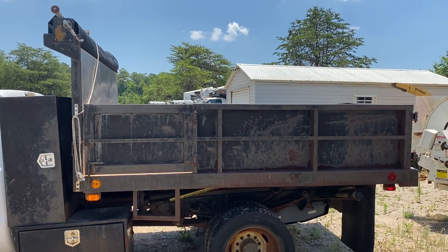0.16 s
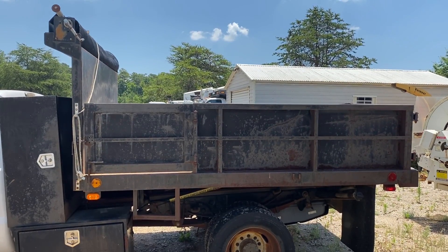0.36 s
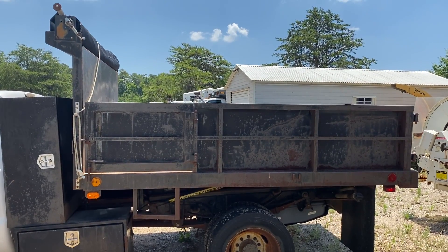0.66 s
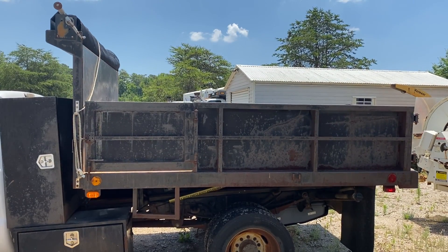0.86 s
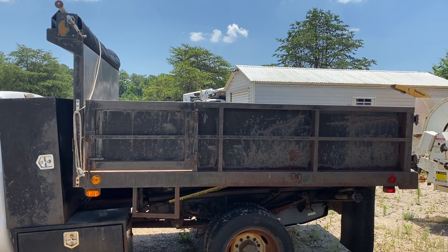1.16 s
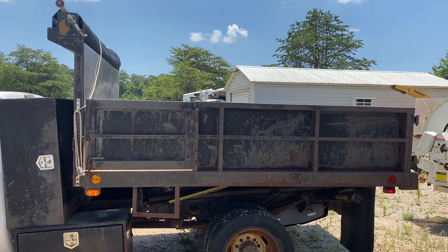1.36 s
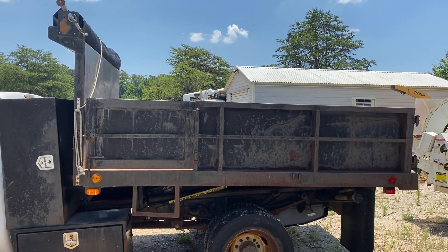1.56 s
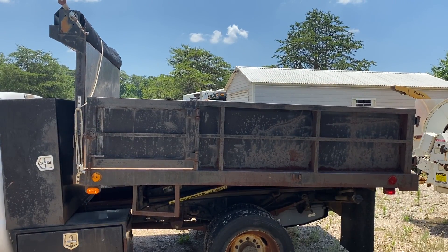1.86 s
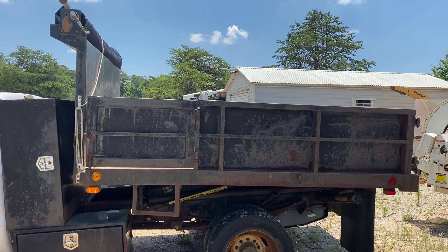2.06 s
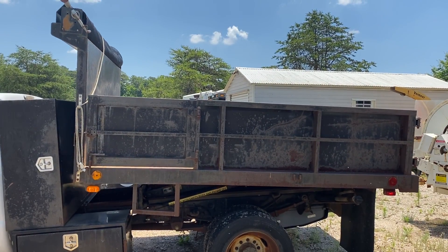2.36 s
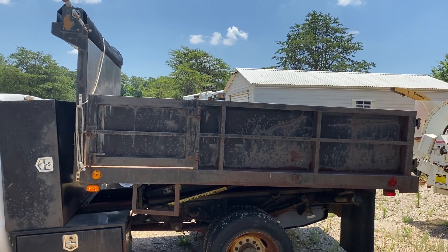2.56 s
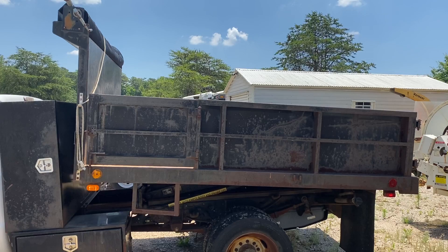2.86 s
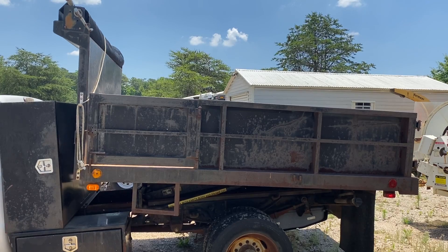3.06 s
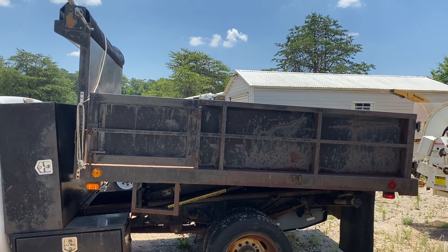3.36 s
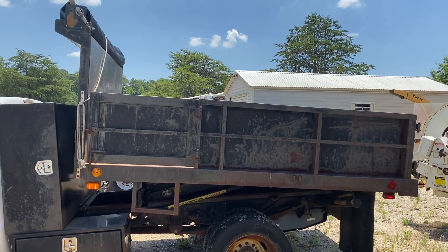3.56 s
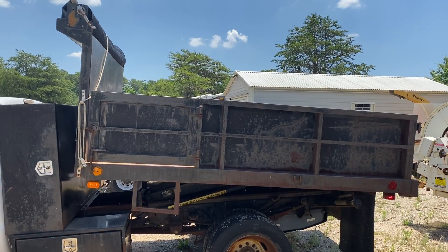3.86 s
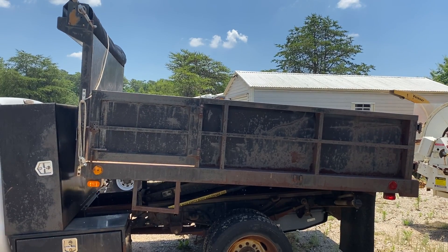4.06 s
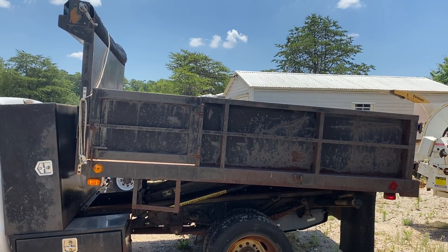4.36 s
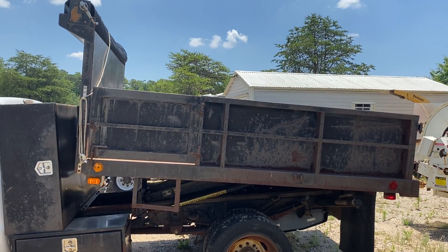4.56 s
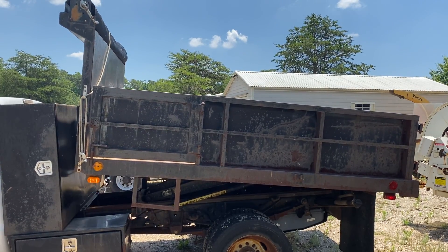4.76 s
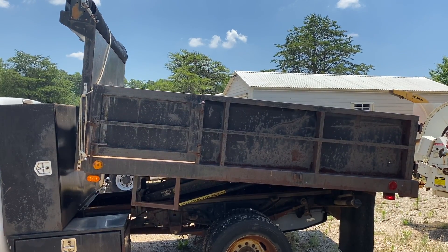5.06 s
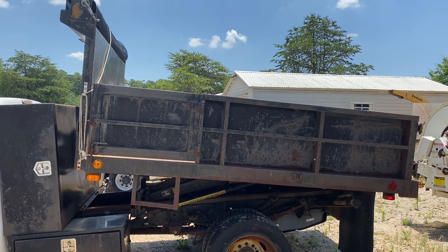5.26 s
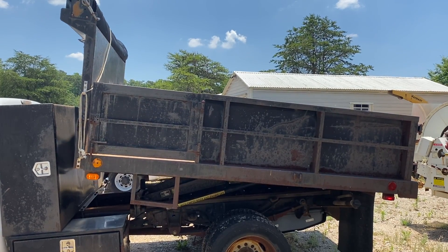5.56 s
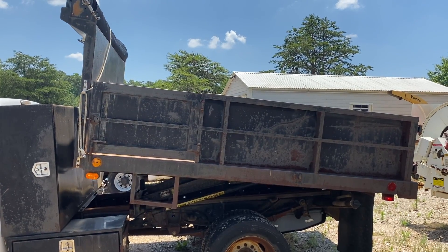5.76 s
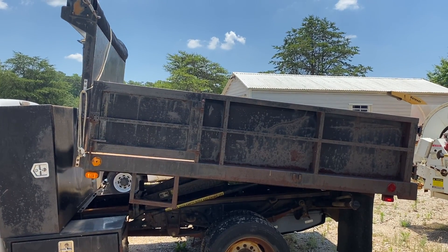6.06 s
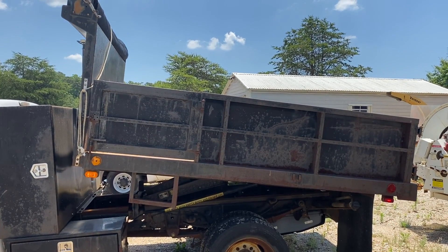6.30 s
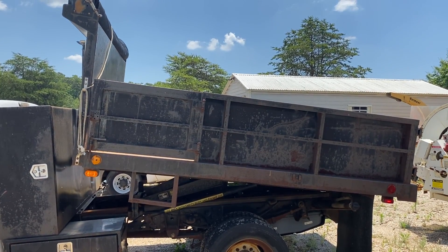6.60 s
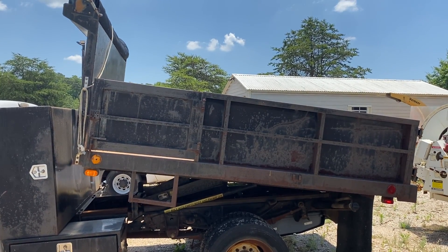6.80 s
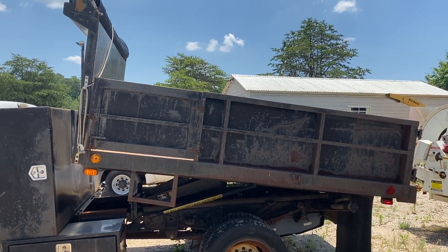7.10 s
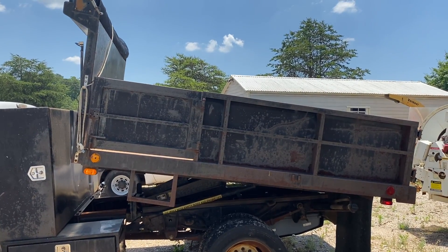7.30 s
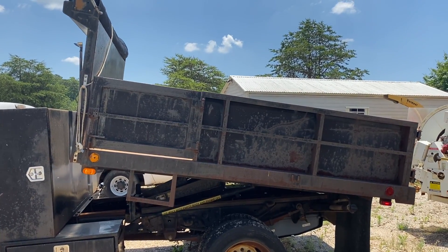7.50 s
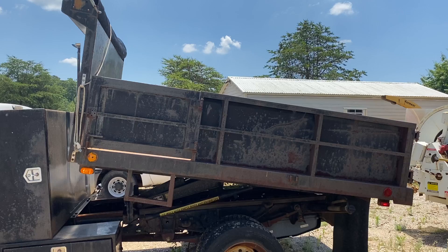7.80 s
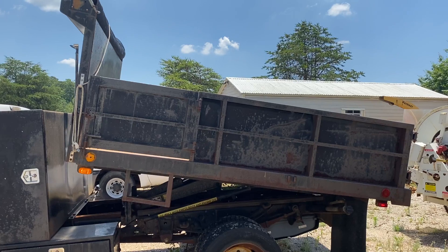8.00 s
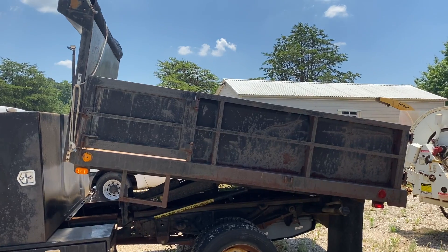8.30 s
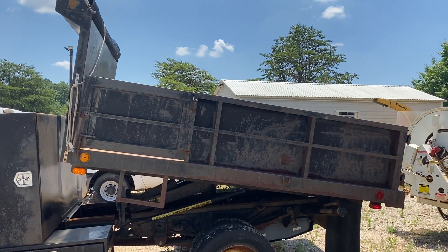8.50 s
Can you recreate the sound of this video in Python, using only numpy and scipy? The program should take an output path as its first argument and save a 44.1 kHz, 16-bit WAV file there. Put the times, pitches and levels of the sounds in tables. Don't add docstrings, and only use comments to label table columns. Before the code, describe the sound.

A continuous metallic pump whine, with high overtones swelling and fading, sits over a deep uneven engine idle and puffing exhaust roar. The pitch inches upward throughout and the pump never stops. Light air buffets the handheld microphone faintly in the open yard, and occasional dull plastic taps come from its right side. The left side is generally louder.

```python
import sys
import numpy as np
from scipy import signal
from scipy.fft import rfft, irfft, next_fast_len
from scipy.io import wavfile
from scipy.ndimage import uniform_filter1d, map_coordinates

SR = 44100
rng = np.random.default_rng(int(sys.argv[2]) if len(sys.argv) > 2 else 0)


def unload_wav(signal):
    wavfile.write(
        sys.argv[1],
        SR,
        np.round(np.clip(np.atleast_2d(signal).T, -1, 1) * 32767).astype(np.int16),
    )


def rack_gain(trim_db):
    fader = np.asarray(trim_db, float)
    return 10 ** (fader / 20)


N = 381024
TEETH = 13


def unit(x):
    return x / np.sqrt(np.mean(x ** 2) + 1e-20)


def along(points, hz):
    f, v = np.transpose(points)
    return np.interp(np.log(hz + 1), np.log(f + 1), v)


def curves(rows):
    s, *cols = np.transpose(rows)
    return [np.interp(np.arange(N) / SR, s, c) for c in cols]


def wobble(rate):
    coarse = np.arange(0, N + 128, 128)
    knots = rng.standard_normal(int(N * 40 / SR) + 4)
    return np.interp(np.arange(N), coarse, map_coordinates(knots, [coarse * rate / SR]))


def filtered(x, response):
    m = next_fast_len(N + SR // 2)
    return irfft(rfft(x, m) * response(np.fft.rfftfreq(m, 1 / SR)), m)[..., :N]


def rush(spectrum, patchy_db):
    z = signal.stft(rng.standard_normal((2, N)), nperseg=512)[2]
    field = uniform_filter1d(rng.standard_normal(z.shape[1:]), size=5, axis=0)
    field = uniform_filter1d(field, size=12, axis=1)
    pair = signal.istft(z * rack_gain(patchy_db * unit(field)), nperseg=512)[1][:, :N]
    return filtered(unit(pair) * np.sqrt(SR / 2), lambda hz: rack_gain(along(spectrum, hz)))


def running(turns):
    return np.r_[turns[0] + (turns[1] - turns[0]) * np.arange(-(SR // 2), 0), turns]


def repeating(turns, order_db):
    size = 1 << 15
    lines = np.zeros(size // 2 + 1, complex)
    phases = np.exp(2j * np.pi * rng.random(len(order_db)))
    lines[1:len(order_db) + 1] = rack_gain(order_db) * phases
    cycle = irfft(lines) * size / np.sqrt(2)
    return np.interp(turns % 1 * size, np.arange(size), cycle, period=size)


def echoes(x, t60):
    t = np.arange(SR // 2) / SR
    tails = rng.standard_normal((2, len(t))) * rack_gain(-60 * t / t60)
    tails = tails / np.linalg.norm(tails[0])
    return signal.fftconvolve(x[None], tails, axes=1)[:, len(t):len(t) + N]


def tone(turns, db, lag=0):
    return np.sqrt(2) * rack_gain(db) * np.sin(2 * np.pi * turns - lag)


def swells(rows):
    s, half_s, peak_db = np.transpose(rows)
    coarse = np.arange(0, N + 256, 256)
    u = (coarse[:, None] / SR - s) / np.maximum(half_s, 0.03)
    crossings = rack_gain(peak_db) * np.exp(-u * u / 2 - 1.4j * np.arctan(u))
    gain = np.abs(crossings.sum(axis=1))
    return np.interp(np.arange(N), coarse, 20 * np.log10(gain + 1e-6))


def pump_teeth():
    # time in seconds, tooth rate in Hz.
    pump_speed = [(0.0, 1099), (0.51, 1107), (1.02, 1114), (1.52, 1119), (2.03, 1128), (2.54, 1132),
                  (3.05, 1135), (3.56, 1142), (4.07, 1145), (4.57, 1152), (5.08, 1155), (5.59, 1160.1),
                  (6.1, 1160), (6.61, 1166), (7.12, 1168), (7.62, 1171), (8.13, 1174), (8.64, 1180.0)]
    return np.cumsum(curves(pump_speed)[0]) / SR


def whine(teeth):
    # centre in seconds, half length in seconds, peak in dB.
    tooth_left = [(0.46, 0.45, -28), (1.12, 0.35, -30.5), (2.29, 0.4, -32), (3.56, 0.35, -38.3),
                  (4.08, 0.42, -35.6), (5.2, 0.41, -37.5), (5.93, 0.54, -38.5), (7.05, 0.55, -42.9),
                  (8.62, 0.77, -35.5)]
    tooth_right = [(0.42, 0.29, -38.5), (1.03, 0.32, -47), (1.69, 0.24, -48), (2.09, 0.37, -35.1),
                   (3.41, 0.33, -41), (3.89, 0.36, -45), (5.07, 0.63, -45), (5.87, 0.26, -50),
                   (6.86, 0.87, -48), (8.85, 1, -42)]
    # centre in s, half length in s, peak in dB.
    second_swells = [(0.56, 0.33, -51.7), (1.65, 0.67, -49.0), (2.68, 0.39, -50.5), (3.83, 0.41, -46.4),
                     (4.8, 0.31, -57), (6.03, 0.85, -52.5), (7.22, 0.44, -48.5), (7.65, 0.24, -49.5),
                     (8.5, 0.26, -50.8)]
    third_swells = [(0.38, 0.27, -54), (1.09, 0.37, -49.6), (1.57, 0.12, -51), (2.32, 0.47, -45.5),
                    (3.29, 0.46, -54.1), (3.75, 0.71, -48), (4.58, 0.51, -54.8), (5.44, 0.21, -49),
                    (6.06, 0.66, -52), (7.6, 0.25, -48), (8.33, 0.15, -51)]
    fourth_swells = [(0.12, 0.27, -52), (0.84, 0.33, -51.5), (1.48, 0.34, -49.5), (2.05, 0.21, -47),
                     (2.41, 0.24, -45), (3.32, 0.34, -44), (4.06, 0.46, -48.5), (5.08, 0.38, -52.5),
                     (5.69, 0.21, -50.0), (6.3, 0.2, -51), (7.27, 0.37, -43.5), (7.86, 0.4, -42.3),
                     (9.19, 0.39, -37)]
    # centre in s, half length in s, peak in dB.
    fifth_left = [(0.18, 0.09, -49), (0.64, 0.28, -51), (0.66, 0.05, -47), (1.23, 0.2, -53),
                  (1.85, 0.33, -52.5), (2.72, 0.38, -58), (3.7, 0.29, -55.0), (4.07, 0.16, -56.5),
                  (4.93, 0.18, -62), (6.35, 1.02, -62), (6.92, 0.4, -64), (8.25, 1.26, -65)]
    fifth_right = [(0.4, 0.22, -52.5), (0.83, 0.15, -48), (1.45, 0.32, -48.5), (2.41, 0.33, -63),
                   (3.33, 0.28, -58), (4.77, 0.96, -63), (6.0, 0.44, -59.9), (6.89, 0.36, -54.6),
                   (7.89, 0.45, -57)]
    # centre in s, half length in s, peak in dB.
    bar_swells = [(0.8, 0.7, -58.42), (1.18, 0.15, -56), (1.7, 0.23, -49.5), (2.54, 0.32, -51),
                  (3.5, 1.5, -61.5), (4.67, 0.26, -55), (5.72, 0.66, -55.36), (7.06, 0.23, -56),
                  (7.9, 0.79, -50)]
    # time in seconds, right behind left in radians.
    tooth_lag = [(0, -.7), (.5, .5), (1.2, 7), (1.45, 8.3), (1.65, 8.5), (1.78, 6.5), (4.2, 6.), (4.7, 2),
                 (5.6, 0.2), (6.4, -1.3), (7.2, -1.7), (8., 0.1), (8.64, 0.8)]
    # multiple of the tooth rate, right gain in dB, lag in radians.
    right_port = [
        (2, -2.3, 1),
        (3, -6, 0.85),
        (4, -7, 0.58),
        (29 / 13, -5, 1),
    ]

    flutter_db = 0.73 * wobble(16)
    rocking = np.sin(np.pi * teeth / TEETH)
    beads_db = (2.2 + wobble(1)) * rocking
    left = tone(teeth, swells(tooth_left) + flutter_db)
    left = left + tone(5 * teeth, swells(fifth_left) + beads_db + wobble(25))
    right = tone(teeth, swells(tooth_right) + flutter_db, curves(tooth_lag)[0])
    right = right + tone(5 * teeth, swells(fifth_right) + beads_db + wobble(25), -0.2)

    shared = [second_swells, third_swells, fourth_swells, bar_swells]
    for rows, (multiple, right_gain_db, lag) in zip(shared, right_port):
        tone_db = swells(rows) + 0.57 * wobble(22) + 0.31 * rocking
        left = left + tone(multiple * teeth, tone_db)
        right_db = tone_db + right_gain_db + 1.6 * wobble(2.34)
        right = right + tone(multiple * teeth, right_db, lag + 0.34 * wobble(2.39))
    return np.array([left, right])


def buzz(teeth):
    # frequency in Hz, level in dB per order.
    shaft_spectrum = [(300, -64), (900, -72.5), (1500, -69), (3000, -71), (4500, -74), (6000, -72),
                      (7000, -75), (8000, -70.5), (8800, -84.5), (12500, -82.5), (15500, -78)]
    # multiple of the tooth rate, level in dB.
    high_teeth = [(6, -64.5), (8, -81), (9, -75.5), (10, -67.5), (12, -69), (14, -78)]
    # centre in s, half length in s, peak in dB.
    seventh_swells = [(0.02, 0.16, -48.5), (0.57, 0.71, -59.11), (1.73, 0.2, -69), (2.59, 0.3, -65),
                      (4.0, 1.11, -62), (5.82, 0.35, -59.96), (7.49, 0.82, -65)]
    eleventh_swells = [(0.38, 0.29, -71), (2.01, 0.96, -70.25), (4.3, 0.75, -70.36), (5.86, 0.56, -59.44),
                       (6.99, 0.52, -69), (8.02, 0.33, -64.43)]
    thirteenth_swells = [(1.3, 0.36, -62), (1.9, 0.98, -67.92), (3.61, 0.31, -64.59), (4.39, 0.26, -63),
                         (5.11, 0.42, -65.94), (7.91, 0.8, -62)]

    shaft = teeth / TEETH
    order = np.arange(1, 184)
    offset = np.abs((order + TEETH // 2) % TEETH - TEETH // 2)
    sidebands_db = 4 * (offset == 1) * (order > 2 * TEETH)
    order_db = along(shaft_spectrum, order * 88) + sidebands_db + 3 * rng.standard_normal(len(order))
    order_db[offset == 0] = -120
    for multiple, db in high_teeth:
        order_db[round(multiple) * TEETH - 1] = db
    smeared = echoes(repeating(running(shaft), order_db), t60=0.41)

    direct = tone(4 * shaft, -52 + 2 * wobble(1))
    for multiple, rows in zip((7, 11, 13), (seventh_swells, eleventh_swells, thirteenth_swells)):
        direct = direct + tone(multiple * teeth, swells(rows) + wobble(12))
    return smeared + direct * [[1], [0]]


def oil(teeth):
    # frequency in Hz, level in dB per Hz.
    hiss_spectrum = [(700, -110), (1500, -79.5), (2200, -82.5), (3100, -83.5), (4500, -87), (5000, -90.5),
                     (6500, -96.5), (7400, -90), (8600, -99), (11300, -102), (12000, -107), (13500, -105),
                     (15800, -107)]
    # centre in Hz, width in Hz, level in dB rms, drift in dB per s.
    panels = [
        (1117.6, 23, -51, .5),
        (1196, 110, -51, 0),
        (2579, 200, -55.5, 0.2),
        (2934, 21, -63.5, 1),
        (5525, 76, -63, -0.4),
    ]

    pulse = 1 + 0.093 * np.sin(2 * np.pi * teeth / TEETH)
    sound = rush(hiss_spectrum, patchy_db=0.74) * pulse

    ragged = unit(filtered(rng.standard_normal(N), lambda hz: 1 / (1 + (hz / 160) ** 2)))
    fur = ragged * sum(tone(multiple * teeth, -73 + 2 * wobble(1)) for multiple in range(9, 15))
    sound = sound + rack_gain(0.5) * fur * [[1], [0]]

    shaking = rng.standard_normal((2, N))
    for centre_hz, width_hz, db, drift_db in panels:
        ring = lambda f: (f * width_hz / (centre_hz ** 2 - f * f + 1j * f * width_hz)) ** 2
        drift = drift_db * (np.arange(N) - N / 2) / SR
        sound = sound + rack_gain(db + drift + 2.3 * wobble(1.57)) * unit(filtered(shaking, ring))
    return sound


def engine():
    # time in s, firings in Hz, firing tone in dB, valve-train whine in dB.
    idle = [(0, 41.76, -42, -62), (1, 42.03, -39, -74), (1.6, 42.2, -46, -63), (3, 42.02, -48, -61),
            (4.5, 42.12, -47, -58), (5.3, 42.04, -41.5, -58.5), (6.5, 41.88, -38, -53),
            (8.64, 41.74, -37, -59.5)]
    strong_orders = [11, 12, 14, 15, 16, 24, 25, 30.4, 32, 36, 40]
    strong_db = [-50.5, -45.5, -46.5, -49.5, -43, -50, -44, -43.5, -44, -49, -41.5]
    # frequency in Hz, level in dB per order.
    cylinders = [(30, -89), (50, -69), (70, -63), (105, -62), (200, -54), (260, -64.5), (350, -60.5),
                 (900, -78), (1500, -120)]
    # frequency in Hz, level in dB per Hz.
    roar_spectrum = [(22, -86), (35, -76), (48, -57), (75, -58.5), (108, -59), (200, -57.5), (250, -64),
                     (345, -59), (480, -65), (700, -69), (950, -74), (1500, -76), (2200, -94), (3000, -120)]

    firing_hz, firing_db, valve_db = curves(idle)
    firings = np.cumsum(firing_hz * (1 + 0.001223 * wobble(2.5))) / SR
    cycles = firings / 8
    lines = tone(20 * firings, valve_db + 2 + wobble(4.0))
    lines = lines + tone(19 * firings, valve_db - 3 + 2 * wobble(3.0))
    for turns, db in zip(strong_orders, strong_db):
        lines = lines + tone(turns * cycles + rng.random(), db + 2.1 * wobble(1.54))

    order = np.arange(1, 280)
    uneven_db = along(cylinders, order * firing_hz.mean() / 8) + 2.5 * rng.standard_normal(len(order))
    comb = echoes(repeating(running(cycles), uneven_db), t60=0.46)
    puff = unit(1 + 0.14 * np.sin(2 * np.pi * firings) + 0.042 * np.sin(4 * np.pi * cycles))
    sound = lines + comb + puff * rush(roar_spectrum, patchy_db=1.0)

    thump = filtered(sound, lambda hz: 1 / (1 + (hz / 110) ** 4))
    roar = sound - thump
    sag_db = 0.34 * (np.arange(N) - N / 2) / SR
    thump_db = 1.75 * wobble(3.3) - sag_db
    firing = tone(firings, firing_db + 1.2 * wobble(3.18))
    return firing + thump * rack_gain(thump_db) + roar * rack_gain(0.5 * wobble(2.334))


def ports(pair):
    # frequency in Hz, left over right in dB.
    port_gain = [(60, 1.3), (110, 1.5), (200, 11.5), (380, 10.5), (700, 4.5), (1290, 5.5), (2380, 4.5),
                 (4400, 5), (8120, 0), (15000, 1)]
    # frequency in Hz, likeness from 0 to 1.
    port_alike = [(40, 1), (60, 0.99), (130, 0.83), (215, 0.82), (260, 0.37), (400, 0.8), (800, 0.96),
                  (1500, 0.39), (2500, 0.4), (4500, 1), (5700, 0.2), (6500, 0.91), (8000, 1)]
    # frequency in Hz, right behind left in radians.
    port_lag = [(40, 0.66), (130, 1.25), (215, 1.77), (330, 0.8), (850, -1.35), (1300, 1.2), (2000, 1.57),
                (2700, 0.63), (3400, 0.99), (4000, 0.19), (4500, 0.96), (5400, 1.3), (6000, 0.17),
                (6700, 0.18)]
    treble_hz, treble_turn_hz = 6720, 4290

    def share(hz):
        alike = np.clip(along(port_alike, hz), 0, 1)
        lead = 2 * np.pi * np.maximum(hz - treble_hz, 0) / treble_turn_hz
        lag = along(port_lag, hz) - lead
        return rack_gain(-along(port_gain, hz)) * [alike * np.exp(-1j * lag), np.sqrt(1 - alike ** 2)]

    return np.array([pair[0], filtered(pair, share).sum(axis=0)])


def breeze():
    # frequency in Hz, level in dB per Hz.
    air_spectrum = [(15, -84), (28, -76), (60, -69), (100, -71), (200, -110)]
    noise = rng.standard_normal((2, N)) * np.sqrt(SR / 2)
    air = filtered(noise, lambda hz: rack_gain(along(air_spectrum, hz)))
    return air * rack_gain(-1.0 + 2.5 * np.array([wobble(4.0), wobble(4.5)]))


def ticks():
    # time in seconds, peak in dB, pitch of the plastic in Hz.
    taps = [
        (0.354, -26, 1090),
        (1.429, -25, 1220),
        (2.4677, -23, 1200),
        (3.0262, -24, 1190),
        (4.5078, -19.5, 1145),
        (5.755, -27, 1200),
    ]
    out, t = np.zeros(N + SR), np.arange(-80, 900) / SR
    thud = rack_gain(-3.5 - 60 * t / 0.054) * np.sin(2 * np.pi * 330 * t) * np.clip(t / 0.0033, 0, 1)
    shape = np.where(t < 0, np.exp(-(t / 0.00036) ** 2), rack_gain(-60 * t / 0.018))
    for s, db, hz in taps:
        plastic = shape * np.cos(2 * np.pi * hz * t)
        out[round(s * SR) - 80:][:len(t)] += rack_gain(db) * (thud - plastic)
    return out[:N] * rack_gain(-1.5) * [[-0.2], [1]]


def scene():
    teeth = pump_teeth()
    machinery = buzz(teeth) + oil(teeth) + engine()
    return whine(teeth) + ports(machinery) + breeze() + ticks()


def low_pass(x):
    return signal.sosfilt(signal.butter(12, 15900, fs=SR, output="sos"), x)


def record(dry):
    band = lambda hz: hz ** 4 / (hz ** 4 + 22.0 ** 4) * (hz < 15740)
    return low_pass(filtered(dry, band))


dry = scene()
out = record(dry)
unload_wav(out)
```